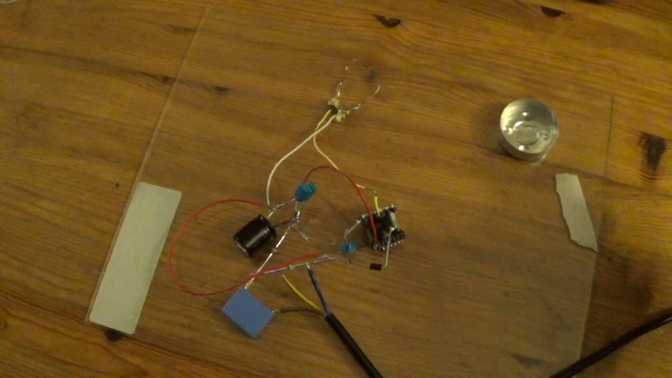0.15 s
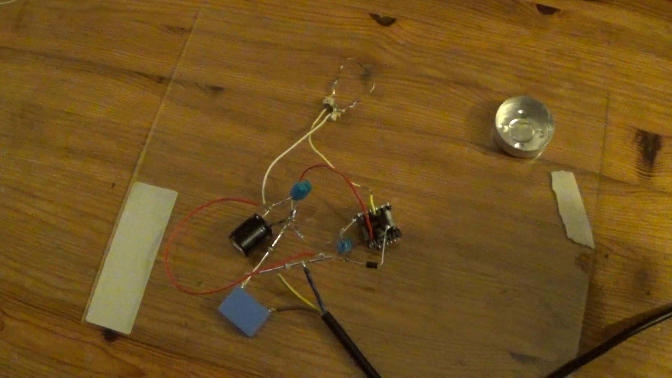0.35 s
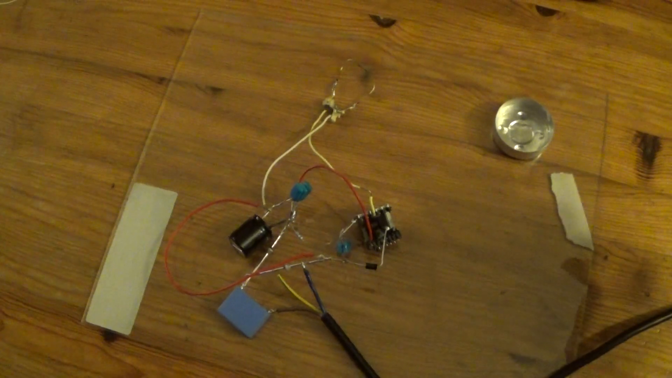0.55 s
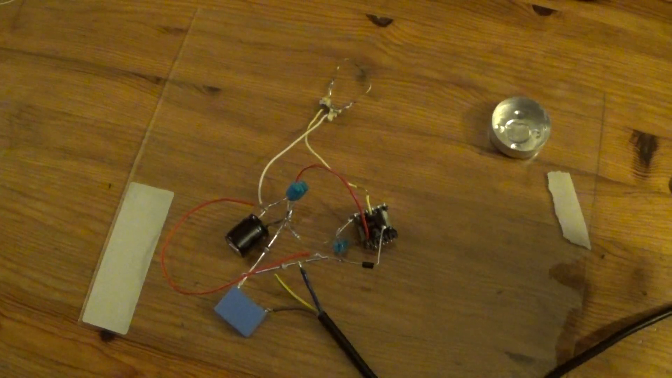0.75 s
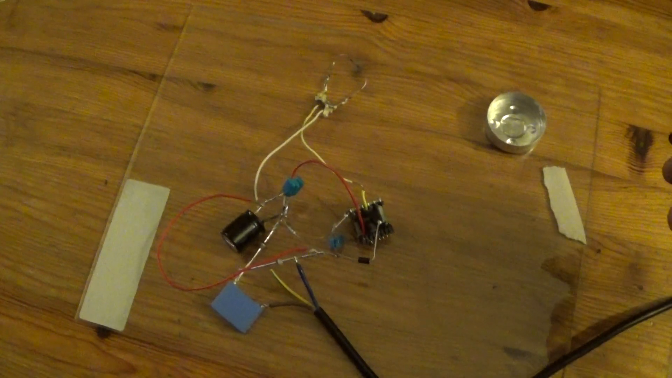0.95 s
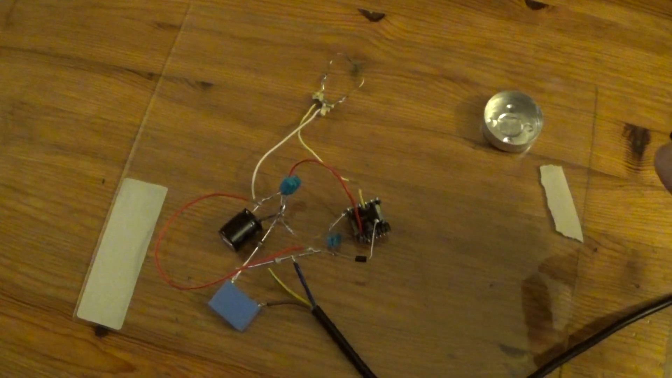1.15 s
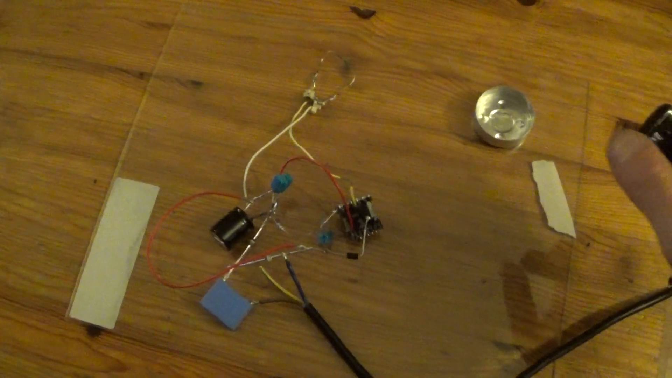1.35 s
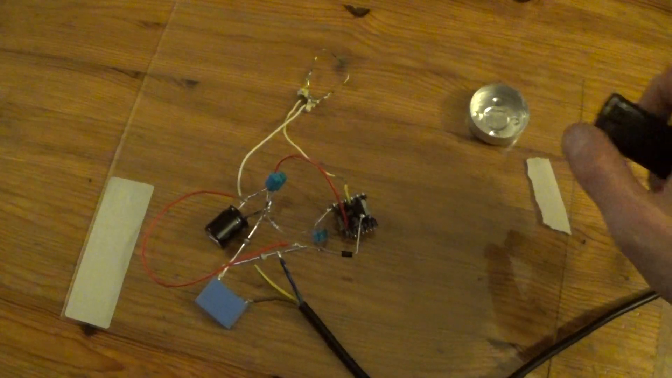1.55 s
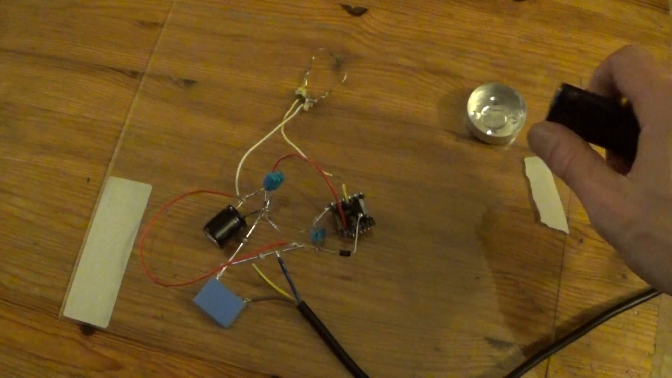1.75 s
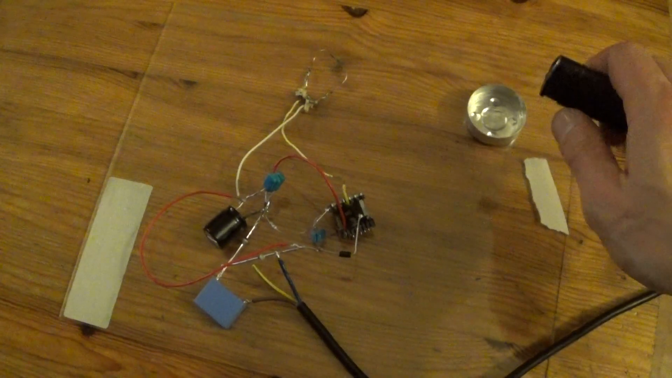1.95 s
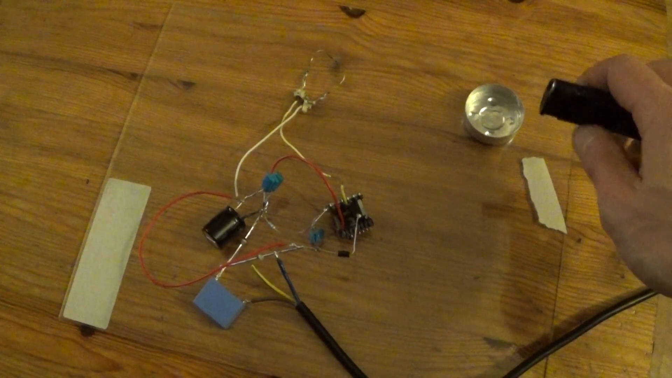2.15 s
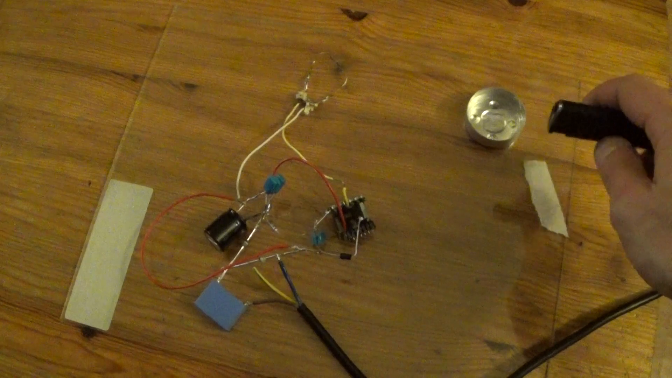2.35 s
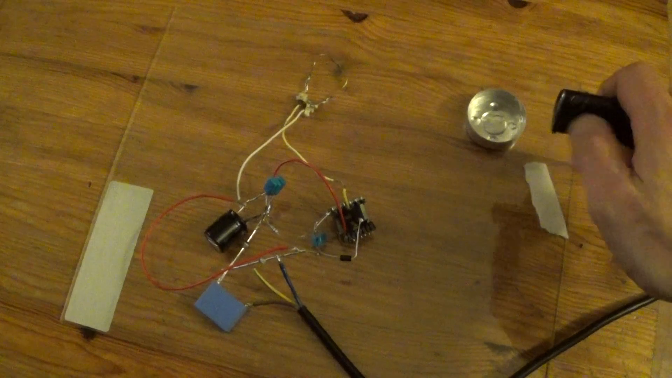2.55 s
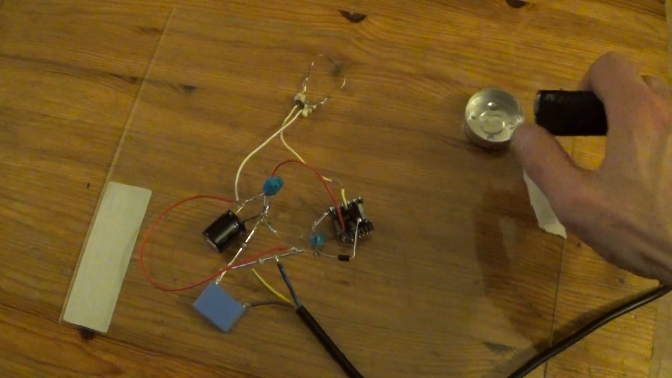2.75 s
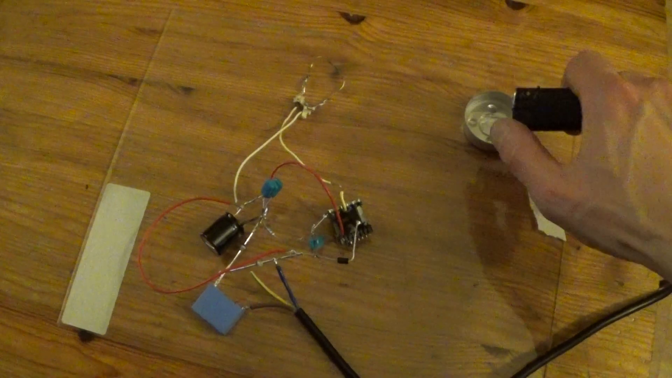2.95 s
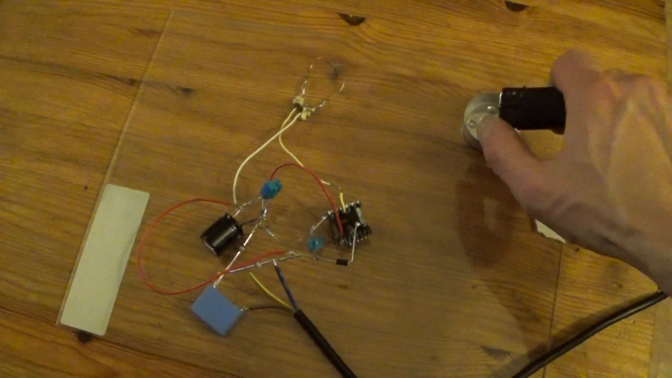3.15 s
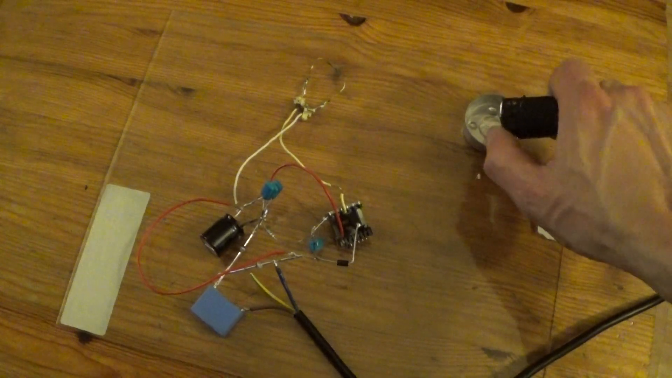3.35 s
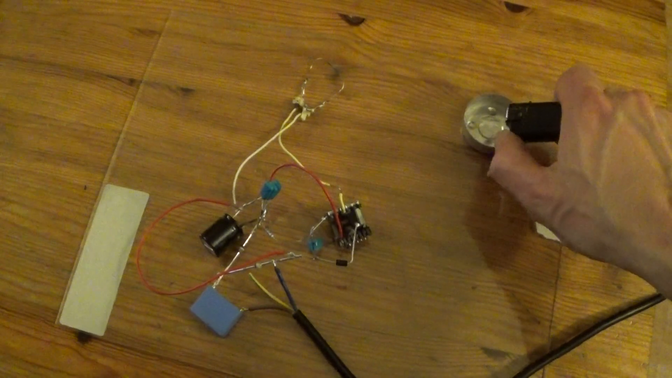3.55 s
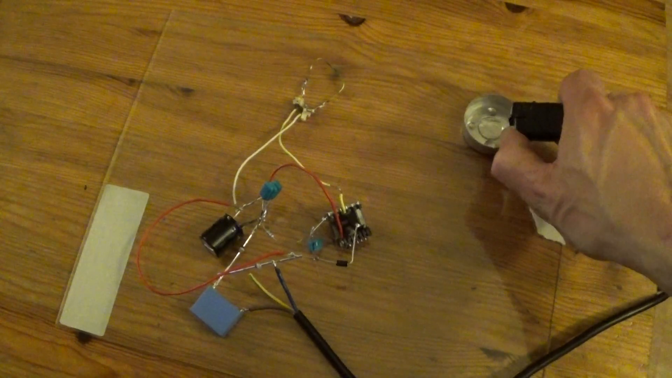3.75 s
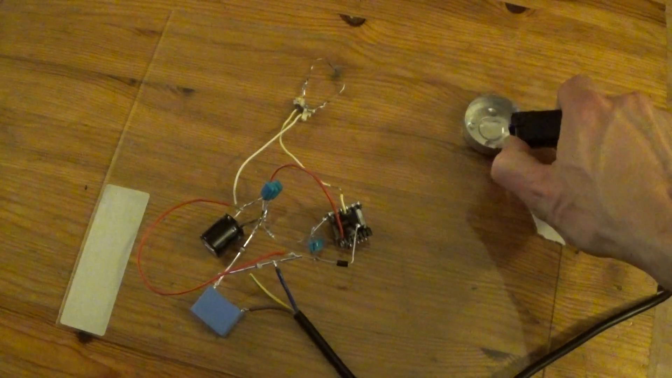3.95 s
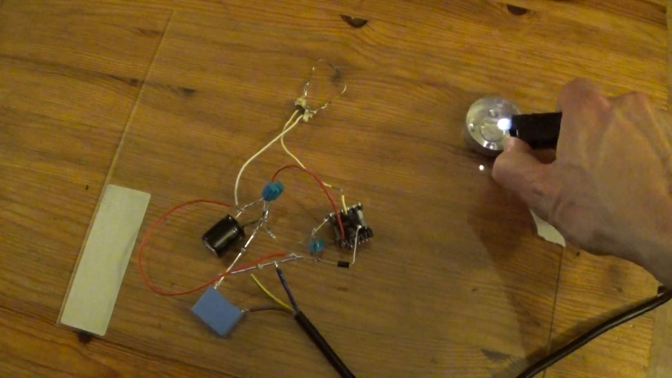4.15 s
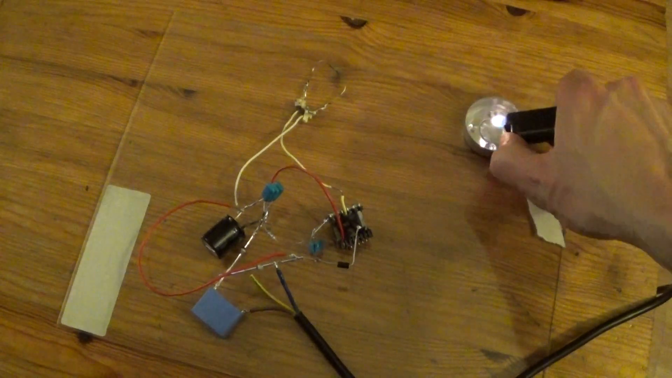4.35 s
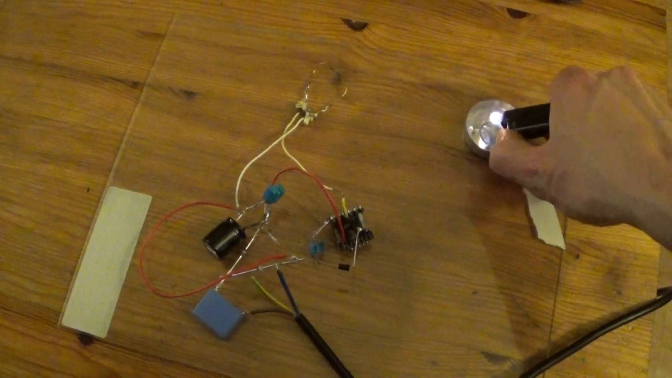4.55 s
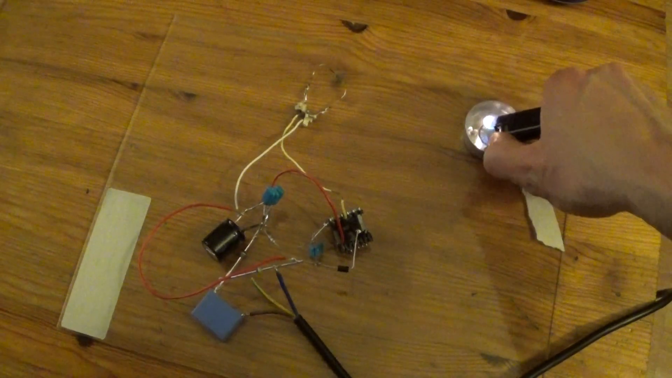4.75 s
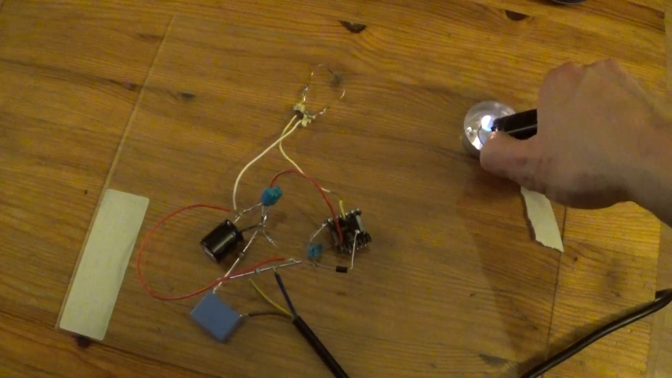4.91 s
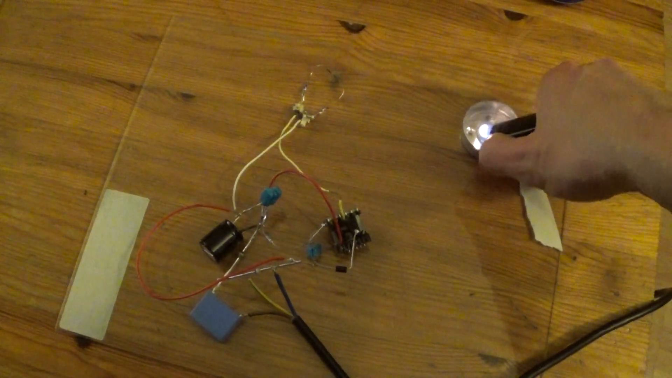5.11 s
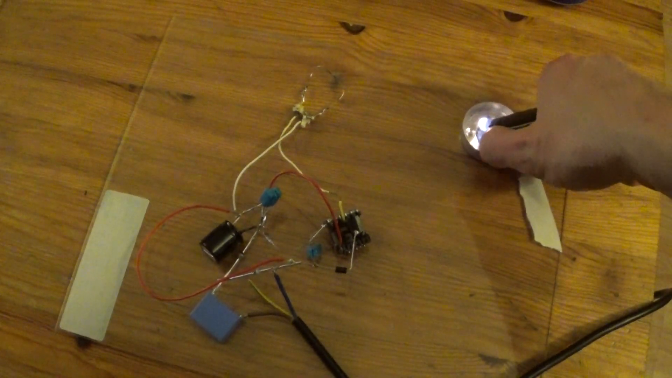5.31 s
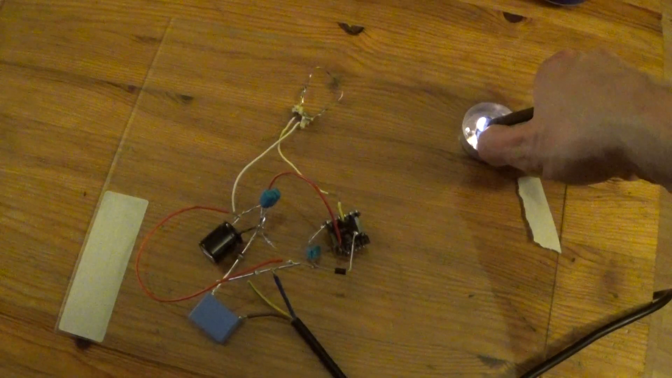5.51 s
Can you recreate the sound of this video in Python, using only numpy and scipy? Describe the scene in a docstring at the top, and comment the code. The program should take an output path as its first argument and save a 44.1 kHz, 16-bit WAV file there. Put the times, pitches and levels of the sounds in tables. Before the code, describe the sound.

In a small, lively room, the tail of an electric spark rings away over faint mains hum and still air. A hand ticks and slides on a torch, a violent snap cracks at two seconds, the torch button clicks on and springs back, it knocks glass, then another loud snap at five seconds is followed by more knocks. The close microphone overloads on the sparks.

```python
"""A high-voltage circuit on a wooden table in a small room, with the microphone close enough to overload. It
opens on the ring of a discharge that has just fired, over mains hum, still air and now and then a thin whistle.
A hand slides and ticks on a torch, the spark gap snaps at 2 s, and the torch button clicks on at 4 s. A glass
ball knocks against a plate, the gap snaps again at 5 s, and more knocks follow. Sparks and contacts are shaped
pulses with echoes; rubbing and air are filtered noise; hum and whistles are sines."""
import sys
import numpy as np
from scipy import signal
from scipy.fft import rfft, irfft
from scipy.io import wavfile
from scipy.ndimage import uniform_filter1d, minimum_filter1d

SR = 44100
rng = np.random.default_rng(int(sys.argv[2]) if len(sys.argv) > 2 else 0)


def waveform_to_disk(signal):
    """Save audio, clipped to [-1, 1], as 16-bit WAV at the path in sys.argv[1]."""
    frames = np.transpose(np.atleast_2d(signal))
    scaled = np.clip(frames, -1, 1) * 32767
    samples = np.round(scaled).astype(np.int16)
    wavfile.write(sys.argv[1], SR, samples)


N = 246078
TIME = np.arange(N) / SR
FREQS = np.maximum(np.fft.rfftfreq(N, 1 / SR), 1)   # at least 1 Hz, so that the logarithm exists


def from_db(db):
    """Decibels to gain."""
    return 10 ** (np.asarray(db) / 20)


def unit_energy(x):
    """Scale so that the squares of a channel sum to one, averaged over the channels."""
    return x / np.sqrt(np.mean(np.sum(x ** 2, axis=-1)) + 1e-20)


def at_hz(points, hz):
    """Read a table on a log-frequency axis."""
    known_hz, values = np.transpose(points)
    return np.interp(np.log(hz), np.log(known_hz), values)


def pulse(colour):
    """The sharpest causal pulse that has this spectrum (minimum phase), cut to 50 ms."""
    log_spectrum = np.log(from_db(at_hz(colour, FREQS)))
    cepstrum = irfft(log_spectrum, N)
    # fold the second half onto the first to make it causal
    cepstrum[1:N // 2] *= 2
    cepstrum[N // 2 + 1:] = 0
    causal = irfft(np.exp(rfft(cepstrum)), N)
    return unit_energy(causal[:SR // 20])


def convolve(a, b):
    """Pass one sound through a response, channel by channel."""
    return signal.fftconvolve(np.atleast_2d(a), np.atleast_2d(b), axes=-1)


def add(out, sound, start_s):
    """Mix a sound in at its time, trimming whatever falls outside the scene."""
    at = int(round(start_s * SR))
    part = sound[..., max(-at, 0):max(N - at, 0)]
    first = max(at, 0)
    out[:, first:first + part.shape[-1]] += part


def swell(length_s):
    """A smooth hump."""
    return np.sin(np.pi * np.linspace(0, 1, int(length_s * SR))).clip(0)


def wander(smooth_samples):
    """Smoothed noise of rms 1, for unsteady pressure or pitch."""
    smooth = uniform_filter1d(rng.standard_normal(N), size=smooth_samples)
    return unit_energy(smooth) * np.sqrt(N)


# stereo width of sound in the room: [hz, side_minus_mid_db]
ROOM_WIDTH = [(60, -31), (110, -26), (200, -36), (380, -21), (700, -18), (1290, -9.5), (2380, -8),
              (4400, -8), (8120, -8.5), (15000, -27)]


def stereo_noise(colour, width=ROOM_WIDTH):
    """Diffuse noise of rms 1, alike at both ports in the bass."""
    mid, side = rfft(rng.standard_normal((2, N)))
    side = from_db(at_hz(width, FREQS)) * side
    both = mid + side * [[1], [-1]]
    coloured = both * from_db(at_hz(colour, FREQS))
    return unit_energy(irfft(coloured, N)) * np.sqrt(N)


# mains hum: [pitch_hz, level_db]
HUM_HARMONICS = [(100, -70.5), (150, -70.5), (200, -80.5), (250, -79.5), (500, -76.5), (750, -77.5)]
# colour of the still air: [hz, relative_level_db]
AIR_COLOUR = [(25, -21.5), (65, -14), (90, -13.5), (125, -12.5), (180, -12), (280, -13), (370, -15.5),
              (500, -14), (800, -14.5), (1300, -17.5), (1650, -16), (3000, -21.5), (7000, -27.5),
              (16000, -28)]
# stereo width of the still air: [hz, side_minus_mid_db]
AIR_WIDTH = [(60, -24), (110, -13), (200, -9), (380, -3), (700, -3), (1290, -2.5), (2380, -4.5), (4400, -5),
             (8120, -9), (15000, -20)]


def background(air_db=-60.5):
    """Mains harmonics as steady sines over the hush of the room."""
    hum = np.zeros(N)
    for pitch_hz, level_db in HUM_HARMONICS:
        cycles = pitch_hz * TIME + rng.random()
        hum += from_db(level_db) * np.sqrt(2) * np.sin(2 * np.pi * cycles)
    return hum + from_db(air_db) * stereo_noise(AIR_COLOUR, AIR_WIDTH)


# a faint, thin whistling: [start_s, length_s, pitch_hz, level_db]
WHISTLES = [(0.564, 0.15, 1045, -60), (2.024, 0.09, 1010, -66), (2.68, 0.082, 853, -71),
            (4.233, .08, 893, -65), (5.395, 0.094, 982, -62)]


def whistles(attack_s=0.02, waver_hz=41.0, rise_hz_per_s=540.0):
    """Short tones of unsteady pitch: each starts quickly, rises a little and fades."""
    out = np.zeros((2, N))
    for start_s, length_s, pitch_hz, level_db in WHISTLES:
        t = TIME[:int(length_s * SR)]
        shape = np.minimum(t / attack_s, 1) * (1 - t / length_s)
        waver = waver_hz * wander(150)[:len(t)]
        glide_hz = pitch_hz + rise_hz_per_s * (t - length_s / 2) + waver
        tone = np.sin(2 * np.pi * np.cumsum(glide_hz) / SR)
        add(out, from_db(level_db) * unit_energy(tone * shape) * np.sqrt(len(t)), start_s)
    return out


# colour of the room's ring: [hz, relative_level_db]
ROOM_COLOUR = [(50, -45), (150, -13), (260, -11), (450, -7), (780, -0.5), (1000, 0), (1300, 1), (2000, 2),
               (2900, 2), (4000, -2), (6300, -4.5), (9500, -0.5), (12000, -3.5), (16000, -7.5)]
# time the ring takes to fall by 60 dB: [hz, t60_s]
ROOM_T60 = [(100, 0.69), (300, 0.39), (800, 0.47), (2000, 0.55), (5000, 0.5), (9000, 0.39), (11500, 0.33),
            (16000, 0.27)]
# the room's strongest resonances: [pitch_hz, relative_level_db]
ROOM_MODES = [(1400, -66), (1793, -53), (1884, -61), (2309, -42.5), (2417, -69), (2767, -64), (2805, -53),
              (2998, -53.5), (3068, -68), (3138, -56), (3467, -58), (3741, -54), (4479, -63), (4764, -49),
              (4963, -63), (5195, -56), (5233, -49.5), (5776, -51)]


def room_modes(t, port_phase=0.82):
    """Standing waves, each met at a slightly different phase (radians) by the two ports."""
    out = np.zeros((2, len(t)))
    for pitch_hz, level_db in ROOM_MODES:
        port_offset = port_phase * rng.standard_normal() * np.array([[1], [-1]])
        phase = 2 * np.pi * rng.random() + port_offset
        decay = from_db(level_db - 60 * t / at_hz(ROOM_T60, pitch_hz))
        out += decay * np.sin(2 * np.pi * pitch_hz * t + phase)
    return unit_energy(out)


# a cluster of echoes off the far walls: [delay_s, spread_s, level_db against the tail]
WALL_ECHOES = (0.042, 0.013, -8.5)
# colour of those echoes: [hz, relative_level_db]
WALL_COLOUR = [(250, -19.5), (750, -1), (1300, -0.5), (2000, 3.5), (2900, 3.5), (3900, -1), (9000, -12.5),
               (16000, -20.5)]


def room_path(room_db=-5, modes_db=-14, build_s=0.011):
    """Echoes thicken over the first milliseconds, then die away, the upper treble fastest."""
    t = TIME[:SR]
    hz, frame_s, frames = signal.stft(stereo_noise(ROOM_COLOUR)[:, :SR], SR, nperseg=512)
    fading = from_db(-60 * frame_s / at_hz(ROOM_T60, hz + 1)[:, None])
    diffuse = signal.istft(frames * fading, SR)[1][:, :SR]
    ring = unit_energy(diffuse) + from_db(modes_db) * room_modes(t)
    tail = ring * (1 - np.exp(-t / build_s))
    delay_s, spread_s, wall_db = WALL_ECHOES
    cluster = np.exp(-((t - delay_s) / spread_s) ** 2)
    walls = stereo_noise(WALL_COLOUR)[:, :SR] * cluster
    return from_db(room_db) * (unit_energy(tail) + from_db(wall_db) * unit_energy(walls))


# reflections off the table and things on it: [delay_s, gain]
NEAR_ECHOES = [(0.0006, 0.65), (0.00115, 0.63), (0.00175, .55), (0.0109, 0.29)]


def near_path(scatter_db=-0.5, scatter_t60_s=0.014):
    """The direct sound, its first reflections and scatter from the clutter."""
    t = TIME[:SR // 20]
    path = np.zeros(len(t))
    path[0] = 1
    for delay_s, gain in NEAR_ECHOES:
        path[int(delay_s * SR)] += gain
    scatter = stereo_noise(ROOM_COLOUR)[:, :len(t)] * from_db(-60 * t / scatter_t60_s)
    return unit_energy(path + from_db(scatter_db) * unit_energy(scatter))


def contact(body, room, t60_s, grit, ring_hz, ring_db, ring_t60_s, room_db):
    """A contact: a sharp edge, a burst of dense modes and one mode that rings on."""
    t = TIME[:len(body)]
    burst = grit * unit_energy(rng.standard_normal(len(t)) * from_db(-60 * t / t60_s))
    burst[0] += 1
    mode = np.sin(2 * np.pi * ring_hz * t) * from_db(-60 * t / ring_t60_s)
    ring = from_db(ring_db) * unit_energy(mode)
    # the room gathers sound from all directions, which evens out the burst's dense modes
    out = from_db(room_db) * convolve(body, room)
    out[:, :len(t)] += unit_energy(convolve(burst, body)[:, :len(t)]) + ring
    return out


# dull bumps passed into the table: [start_s, level_db, ring_hz]
BUMPS = [(3.7785, -30.5, 720), (4.0582, -23, 230)]
# colour of the wood: [hz, relative_level_db]
BUMP_COLOUR = [(40, -15), (200, -1), (800, 7), (1500, -4.5), (4000, -27), (16000, -50)]


def bumps(room):
    """The wooden table answers a push with a short thud."""
    out, wood = np.zeros((2, N)), pulse(BUMP_COLOUR)
    for start_s, level_db, ring_hz in BUMPS:
        thud = contact(wood, room, t60_s=0.031, grit=1.4,
                       ring_hz=ring_hz, ring_db=-2, ring_t60_s=0.039, room_db=-4)
        add(out, from_db(level_db) * thud, start_s)
    return out


# the arm reaching across the table: [start_s, length_s, level_db]
RUSTLES = [(1.31, 0.23, -68.5), (1.69, 0.098, -62.5), (3.38, 0.15, -70), (4.70, 0.11, -61)]
# colour of the reaching arm: [hz, relative_level_db]
RUSTLE_COLOUR = [(200, -6), (900, 4), (1800, -4), (4000, 4), (7000, -0.5), (16000, -11)]
# fingers sliding on the torch: [start_s, length_s, level_db]
SLIDES = [(1.30, .11, -70), (1.70, 0.19, -65), (1.897, 0.055, -57.5), (2.545, 0.098, -57.5),
          (2.90, 0.087, -67.5), (4.618, 0.12, -61), (4.963, 0.075, -70)]
# colour of the sliding fingers: [hz, relative_level_db]
SLIDE_COLOUR = [(500, -23), (2500, -3), (4500, -4), (7500, 0.5), (10500, 0), (13000, -12), (16000, -10)]


def rubbing(strokes, colour, grain_db):
    """A soft hiss, grainy as it sticks and slips."""
    grain = wander(60)
    pressure = np.zeros((2, N))
    for start_s, length_s, level_db in strokes:
        add(pressure, from_db(level_db) * swell(length_s), start_s)
    return pressure * from_db(grain_db * grain) * stereo_noise(colour)


# small ticks of the handled torch: [start_s, level_db, ring_hz]
TICKS = [(1.243, -22, 9100), (1.2583, -34, 5300), (2.6353, -16, 9530), (2.6564, -25.5, 10900),
         (3.7013, -27.5, 10900), (3.7777, -19.5, 11700), (4.38, -34.5, 10000), (4.4308, -30, 11500),
         (4.831, -24.5, 9600), (4.9986, -29.5, 10040), (5.3042, -24.5, 10400), (5.3178, -27, 10500)]
# colour of the torch casing: [hz, relative_level_db]
TICK_COLOUR = [(100, -25), (1800, -4), (3000, -12.5), (5400, 0), (7500, -2), (9500, 5), (11500, 0),
               (13000, -2), (16000, -11.5)]


def ticks(room, hardest_t60_s=0.029, halving_db=7):
    """The casing ticks in the grip; chatter time halves for each halving_db below the hardest tick."""
    out, casing = np.zeros((2, N)), pulse(TICK_COLOUR)
    hardest_db = max(level_db for _, level_db, _ in TICKS)
    for start_s, level_db, ring_hz in TICKS:
        t60_s = hardest_t60_s * 2 ** ((level_db - hardest_db) / halving_db)
        tick = contact(casing, room, t60_s, grit=6.6,
                       ring_hz=ring_hz, ring_db=-4, ring_t60_s=0.025, room_db=-5)
        add(out, from_db(level_db) * tick, start_s)
    return out


# glass ball knocking against the plate: [start_s, level_db]
KNOCKS = [(4.794, -19.5), (5.444, -26), (5.475, -17.5), (5.5585, -17.5)]
# colour of glass ball against plate: [hz, relative_level_db]
KNOCK_COLOUR = [(100, -43), (1100, -8), (2400, 0), (3400, -4), (4200, -2.5), (5800, -14), (8000, -11.5),
                (10400, -3.5), (12500, -12), (16000, -21)]


def knocks(room, bounce_s=0.005, bounce_loss_db=6.5):
    """The glass ball meets the plate and bounces once, touching again more softly."""
    out, glass = np.zeros((2, N)), pulse(KNOCK_COLOUR)
    for start_s, level_db in KNOCKS:
        second_touch = (start_s + bounce_s, level_db - bounce_loss_db)
        for touch_s, touch_db in ((start_s, level_db), second_touch):
            touch = contact(glass, room, t60_s=0.069, grit=2.5,
                            ring_hz=2383, ring_db=-10, ring_t60_s=0.062, room_db=-6)
            add(out, from_db(touch_db) * touch, touch_s)
    return out


# torch button going down and latching: [start_s, level_db]
PRESS = [(4.0186, -15), (4.022, 4.5)]
# colour of the latch: [hz, relative_level_db]
PRESS_COLOUR = [(100, -34), (1300, -21.5), (1750, -2.5), (2200, -9), (2750, -2), (3500, -9.5), (4400, -10),
                (4900, -0.5), (5600, -4.5), (7000, 7), (8700, 2.5), (9800, 9.5), (12000, -2.5), (16000, 0)]
# the button springing back: [start_s, level_db]
RELEASE = [(4.1827, 3.5)]
# colour of the spring-back: [hz, relative_level_db]
RELEASE_COLOUR = [(100, -30), (700, -28), (3000, -13), (4700, -3), (7500, -0.5), (9500, 4.5), (11000, 9),
                  (13000, -2), (16000, -6)]


def button(room):
    """The switch latches with a click that fills the room, and springs back with a drier one."""
    out, latch, spring = np.zeros((2, N)), pulse(PRESS_COLOUR), pulse(RELEASE_COLOUR)
    for start_s, level_db in PRESS:
        click = contact(latch, room, t60_s=0.014, grit=1.8,
                        ring_hz=10000, ring_db=-15, ring_t60_s=0.024, room_db=6)
        add(out, from_db(level_db) * click, start_s)
    for start_s, level_db in RELEASE:
        click = contact(spring, room, t60_s=0.0073, grit=0.88,
                        ring_hz=10400, ring_db=-21, ring_t60_s=0.017, room_db=-9.0)
        add(out, from_db(level_db) * click, start_s)
    return out


# discharges across the gap, the first fired just before the start: [start_s, level_db]
SPARKS = [(-0.0207, 17.5), (2.0786, 18), (5.0360, 20.5)]
# colour of a discharge: [hz, relative_level_db]
SPARK_COLOUR = [(30, -4), (100, -4.5), (300, 4), (750, 2.5), (2000, 0), (5000, 3), (10000, 0.5),
                (12500, -5.5), (16000, -13)]


def sparks(near, room):
    """Each discharge is one shock pulse; all that follows it is the table and the room."""
    out, shock = np.zeros((2, N)), pulse(SPARK_COLOUR)
    for start_s, level_db in SPARKS:
        for path in (near, room):
            add(out, from_db(level_db) * convolve(shock, path), start_s)
    return out


def tilt(left_minus_right_db):
    """Gains that lean the sound to one side."""
    return from_db(np.array([[left_minus_right_db], [-left_minus_right_db]]) / 2)


def scene():
    """Sparks and torch share one room; the hand works a little to the right."""
    near, room = near_path(), room_path()
    torch = bumps(room) + ticks(room) + knocks(room) + button(room)
    arm = rubbing(RUSTLES, RUSTLE_COLOUR, grain_db=3.0)
    fingers = rubbing(SLIDES, SLIDE_COLOUR, grain_db=2.5)
    hand = (torch + arm + fingers) * tilt(-1.5)
    everything = background() + whistles() + hand + sparks(near, room)
    return everything * tilt(-0.17)   # the right port is a little more sensitive


def limiter(x, ceiling_db=-1.5, release_db_per_s=370.0, opening_cut_db=3.5):
    """The gain drops just ahead of a peak and climbs back steadily; it starts out still recovering."""
    peak_db = 20 * np.log10(np.abs(x).max(axis=0) + 1e-9)
    over_db = np.maximum(peak_db - ceiling_db, 0)
    over_db[0] = max(over_db[0], opening_cut_db)
    climb_db = release_db_per_s * TIME
    gain_db = climb_db - np.maximum.accumulate(over_db + climb_db)
    ahead_db = minimum_filter1d(gain_db, size=9)
    return x * from_db(uniform_filter1d(ahead_db, size=9))


def record(dry, overload_db=11.5, treble_hz=14500.0, cutoff_hz=15800):
    """The microphone rounds the shock and dulls the treble, the limiter ducks behind it, the top is cut."""
    top = from_db(overload_db)
    rounded = top * np.tanh(dry / top)
    rolloff = signal.butter(2, treble_hz, fs=SR, output="sos")
    limited = limiter(signal.sosfilt(rolloff, rounded))
    top_cut = signal.ellip(10, .1, 90, cutoff_hz, fs=SR, output="sos")
    return signal.sosfilt(top_cut, limited)


dry = scene()
out = record(dry)
waveform_to_disk(out)
```